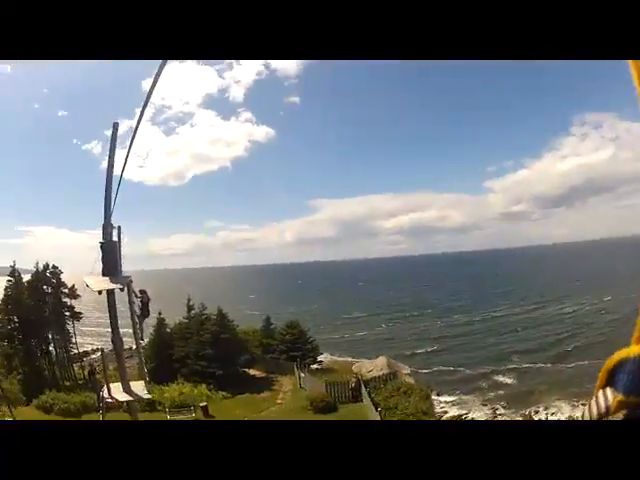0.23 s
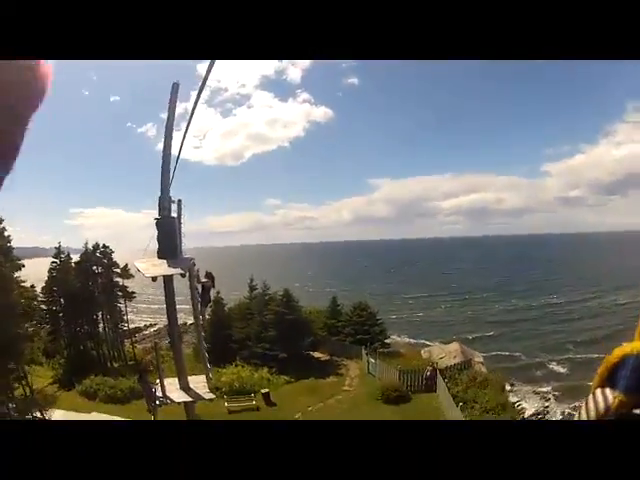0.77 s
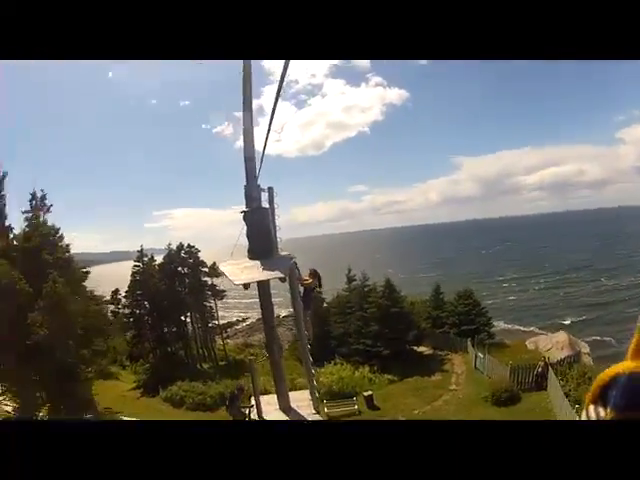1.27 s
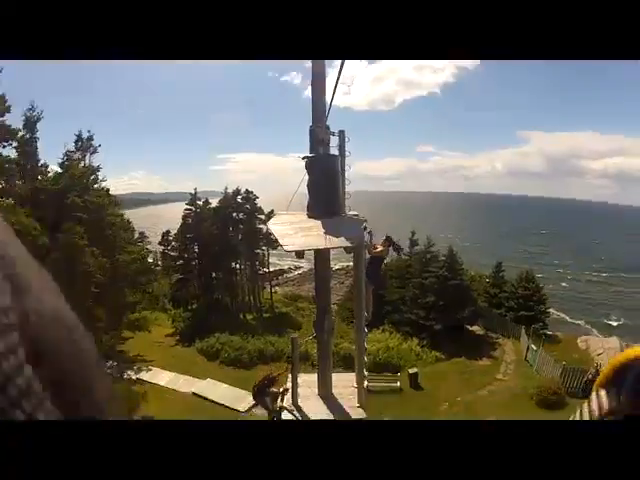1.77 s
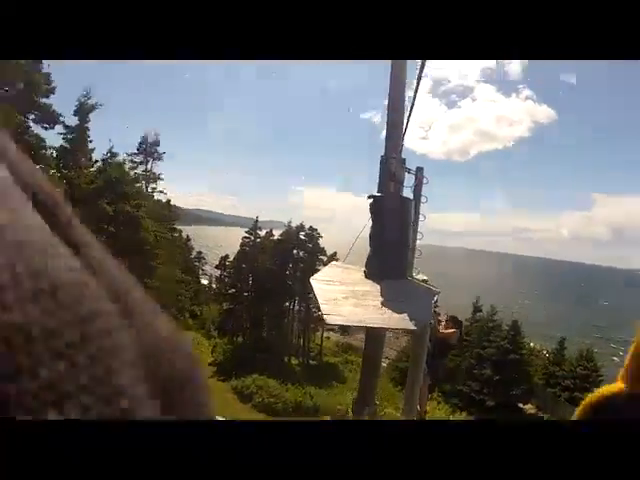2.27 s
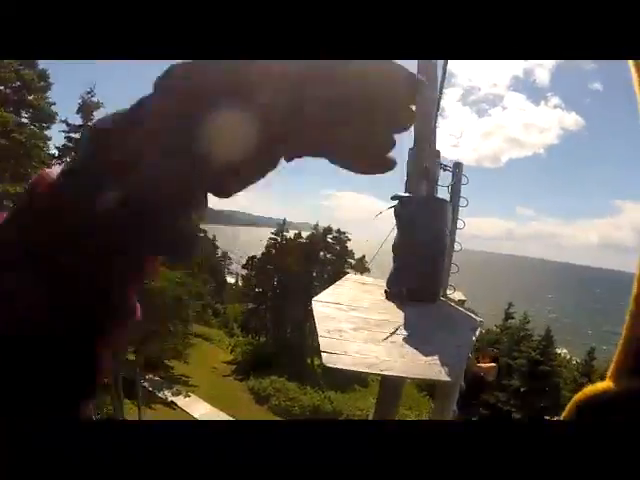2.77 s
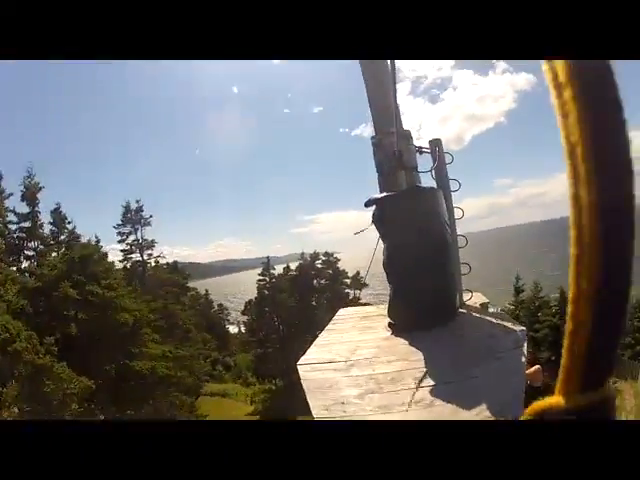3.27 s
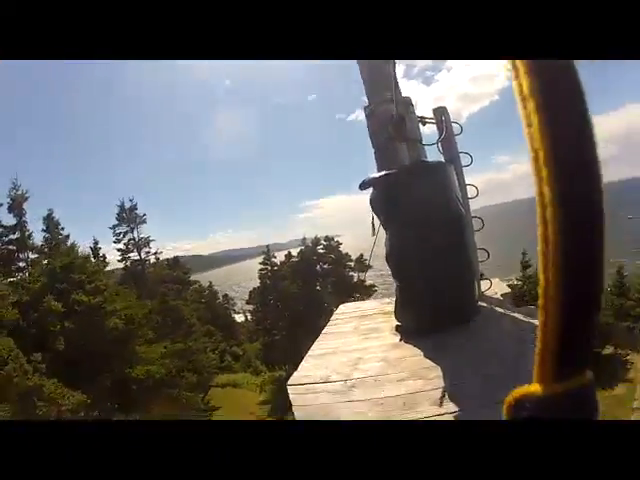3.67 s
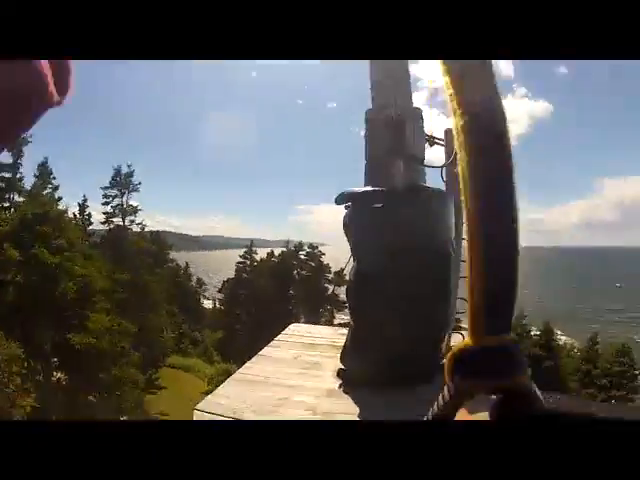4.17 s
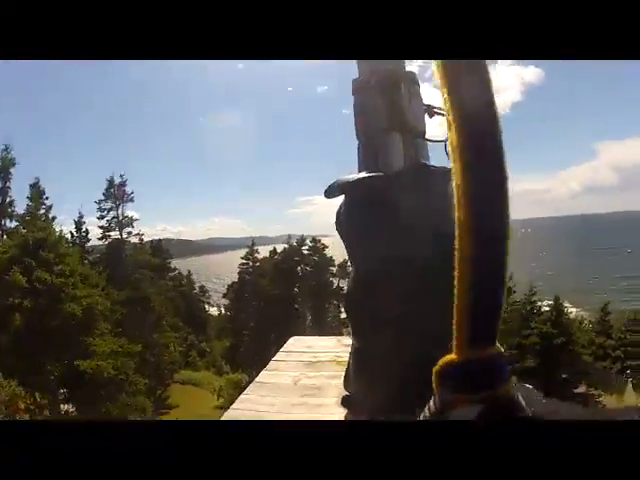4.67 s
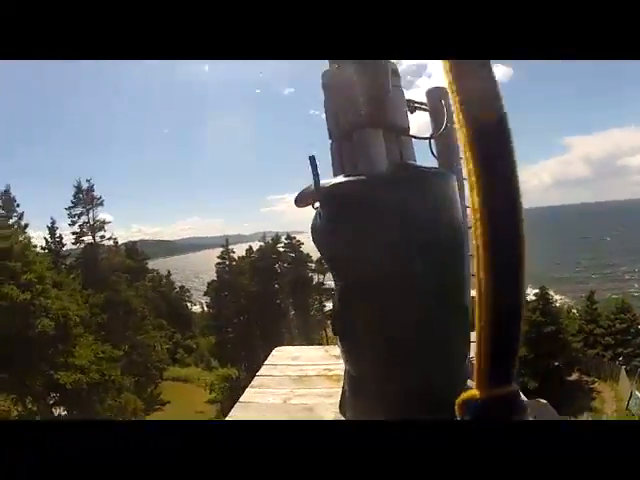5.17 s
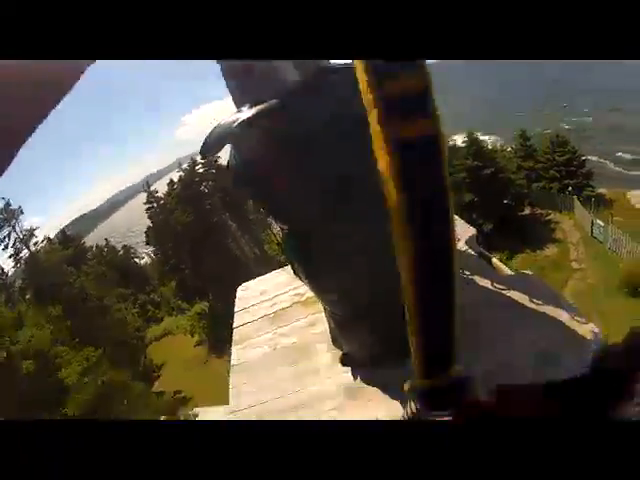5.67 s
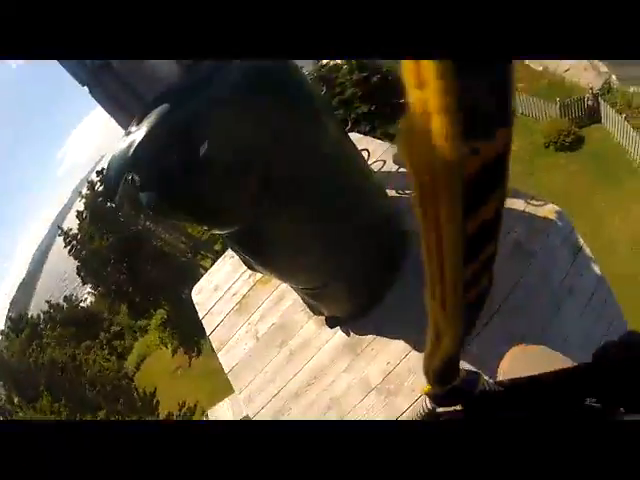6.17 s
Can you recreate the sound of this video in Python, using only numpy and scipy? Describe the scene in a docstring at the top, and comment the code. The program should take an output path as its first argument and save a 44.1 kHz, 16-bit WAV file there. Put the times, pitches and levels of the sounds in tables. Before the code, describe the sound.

Rushing metallic wheel hiss with a faint fluttering whine falls to ratchety ticking, amid blustery microphone wind, hard thumps, housing knocks and late clinks.

```python
"""Trolley wheels hiss over the strands of a zip line while wind buffets the rider's microphone.
The hiss is coloured noise that thins to strand-by-strand ticks as the ride slows, with a faint fluttering whine.
The wind is noise shaped by gusts, plus single pressure thumps. Gear knocks, scrapes and clinks at the camera:
short decaying sines and noise through resonances. A limiter ducks just after each overload."""
import sys
import numpy as np
from scipy import signal
from scipy.fft import rfft, irfft, next_fast_len
from scipy.io import wavfile
from scipy.ndimage import uniform_filter1d, map_coordinates

SR = 44100
rng = np.random.default_rng(int(sys.argv[2]) if len(sys.argv) > 2 else 0)


def output_pcm(signal):
    """Save a mono or channel-first signal as 16-bit PCM at the path in sys.argv[1].

    Samples are clipped to [-1, 1] before scaling.
    """
    pcm = np.clip(np.atleast_2d(signal).T, -1, 1) * 32767
    wavfile.write(sys.argv[1], SR, np.round(pcm).astype(np.int16))


N = 283122  # length in samples
REFERENCE_RATE = 119.6  # reference speed, strands per second


def amp(db):
    """Decibels to gain."""
    return 10 ** (np.asarray(db) / 20)


def unit(x):
    """Scale to rms 1."""
    return x / np.sqrt(np.mean(x ** 2) + 1e-20)


def curves(rows):
    """One value per sample for each column after the time."""
    times, *columns = np.transpose(rows)
    return [np.interp(np.arange(N) / SR, times, column) for column in columns]


def wobble(rate):
    """A smooth random curve with rate knots a second."""
    knots = rng.standard_normal(4000)
    return map_coordinates(knots, [np.arange(N) * rate / SR], mode="mirror")


def noise():
    """Fresh white noise."""
    return rng.standard_normal(N)


def filtered(x, response):
    """x with its spectrum multiplied by a response of frequency."""
    size = next_fast_len(N + 8192)
    spectrum = rfft(x, size) * response(np.fft.rfftfreq(size, 1 / SR))
    return irfft(spectrum, size)[..., :N]


def coloured(x, points):
    """x through a spectrum of (Hz, dB) points, at rms 1."""
    point_hz, point_db = np.transpose(points)

    def response(hz):
        return amp(np.interp(np.log(hz + 1), np.log(point_hz), point_db))

    return unit(filtered(x, response))


def patchy(x, depth_db):
    """Let the colour of x drift in patches of random gain over time and frequency."""
    frames = signal.stft(x, nperseg=1024)[2]
    field = rng.standard_normal(frames.shape)
    field = uniform_filter1d(field, size=5, axis=0)
    field = uniform_filter1d(field, size=12, axis=1)
    return signal.istft(frames * amp(depth_db * unit(field)))[1][:N]


def add(track, s, sound):
    """Mix a short sound into a track at time s."""
    room = track[round(s * SR):][:len(sound)]
    room += sound[:len(room)]


def strokes(rows):
    """A rounded swell for each (start, length, dB) row."""
    swell = np.zeros(N)
    for s, length, db in rows:
        shape = signal.windows.tukey(max(int(length * SR), 8), .5)
        add(swell, s, amp(db) * shape)
    return swell


def friction(modes, rows, grain_db):
    """Uneven slips excite the resonances of a body during each stroke."""
    def body(f):
        return sum(amp(db) / (1 + ((f - hz) / half_width) ** 2) for hz, half_width, db in modes)

    slips = noise() * amp(grain_db * wobble(430))
    return unit(filtered(slips, body)) * strokes(rows)


def doublings(rate):
    """Speed in doublings over the reference speed."""
    return np.log2(rate / REFERENCE_RATE)


# Gusts on the microphone.
# Each row: start in seconds, length in seconds, buffet level in dB, churn level in dB before wind's trim.
GUSTS = [(.025, 0.28, -12, -21), (0.385, 0.31, -11, -17.5), (0.946, .03, -10, -16),
         (1.141, 0.088, -4, -10.5), (1.288, 0.11, -5.5, -14), (1.482, .04, -9, -37),
         (1.833, 0.13, -17.5, -24), (2.016, 0.092, -14.5, -22.5), (2.167, 0.042, -4.5, -12.5),
         (2.276, 0.074, -5.5, -11.5), (2.32, 0.11, -5, -40), (2.505, 0.23, -10, -17),
         (2.702, 0.11, -7.5, -28), (3.233, 0.053, -14, -25.5), (3.293, 0.13, -11, -20.5),
         (4.129, .13, -14.5, -16.5), (4.427, 0.035, -13.5, -20), (4.733, 0.026, -10.5, -28),
         (4.801, 0.073, -11, -22), (5.175, .08, -22, -26), (5.358, 0.06, -12.5, -21.5),
         (5.445, 0.23, -7.5, -12), (5.684, 0.17, -7, -10), (5.886, 0.16, -8, -12), (6.07, 0.27, -11, -13.5),
         (6.367, 0.14, -3, -12.5)]
GUST_RISE_S, GUST_FALL_S = 0.011, 0.054  # time constants of a gust
# the airstream between gusts at the reference speed, churn before wind's trim
BREEZE_BUFFET_DB, BREEZE_CHURN_DB = -21, -25.5
BREEZE_DB_PER_DOUBLING = 0.5  # its growth with speed


def airflow(rate):
    """Buffet and churn in dB: a breeze that grows with speed, plus gusts that rise, hold and die away."""
    t = np.arange(N) / SR
    breeze_db = BREEZE_DB_PER_DOUBLING * doublings(rate)
    power = amp([breeze_db + BREEZE_BUFFET_DB, breeze_db + BREEZE_CHURN_DB]) ** 2
    for s, length, buffet_db, churn_db in GUSTS:
        rise = 1 - np.exp(-np.maximum(t - s, 0) / GUST_RISE_S)
        fall = np.exp(-np.maximum(t - s - length, 0) / GUST_FALL_S)
        power += (amp([[buffet_db], [churn_db]]) * rise * fall) ** 2
    return 10 * np.log10(power)


# Colours of the wind: deep buffets, churning eddies, whistle in the microphone port, hiss over the housing.
# Each row: frequency in Hz, relative level in dB.
BUFFET = [(12, -6), (30, -7.5), (90, 0), (150, -2), (230, -8.5), (400, -24.5), (800, -38), (1500, -80)]
CHURN = [(100, -15.5), (230, 2), (340, -1), (500, -8), (750, -17), (1050, -31.5), (1500, -42), (3000, -81)]
PORT = [(3000, 5), (6000, -41), (8500, -19), (10000, -20), (10800, -9), (11650, 12.5), (12450, 7.5),
        (13300, -38), (14200, -1), (15500, -6.5)]
RUSH = [(700, 14), (1400, -7), (2000, 2), (3000, -1), (3800, -1), (4800, -13.5), (6000, -22), (8300, -9),
        (10000, -6.5), (10800, -23), (14200, -15)]


def wind(rate, churn_gain_db=1, port_db=-22, rush_db=-13, rush_growth=1.08, side_db=-11, side_growth=2.86):
    """Eddies hit the microphone; the harder ones churn higher, whistle in its port and hiss over the housing."""
    buffet_db, churn_db = airflow(rate)
    eddies = wobble(45)
    buffet = coloured(noise(), BUFFET) * amp(buffet_db + 0.27 * eddies)
    churn_flicker_db = 0.8 * eddies + 2.47 * wobble(160)
    churn = coloured(noise(), CHURN) * amp(churn_db + churn_gain_db + churn_flicker_db)
    port = coloured(noise(), PORT) * amp(churn_db + port_db + 2 * eddies)
    # the rush grows faster than the churn
    rush = coloured(noise(), RUSH) * amp(rush_growth * churn_db + rush_db + 2.5 * eddies)
    # left and right differ mainly in strong turbulence
    side = coloured(noise(), BUFFET) * amp(side_db + side_growth * np.maximum(buffet_db, churn_db))
    return buffet + churn + port + rush + np.array([side, -side])


# Single hard gusts on the microphone.
# Each row: start in seconds, level in dB, length in seconds.
THUMPS = [(1.161, 7.5, 0.0061), (1.21, 3, 0.0053), (2.221, 5.5, 0.0059), (2.299, -5, 0.003),
          (2.67, 12.5, 0.009), (4.256, 3.5, 0.0063), (5.449, -17, 0.00517), (6.131, -1, 0.002)]


def thumps():
    """A hard gust is one push and pull of pressure."""
    out = np.zeros(N)
    for s, db, length in THUMPS:
        turn = np.linspace(0, 2 * np.pi, int(length * SR))
        add(out, s, amp(db) * np.sin(turn) * np.sin(turn / 2))
    return out


# Carabiner clinks. Each row: start in seconds, level in dB.
CLINKS = [(5.8961, -30), (5.908, -32), (6.368, -18), (6.385, -14.5)]
# Modes of the carabiner. Each row: frequency in Hz, relative level in dB, 60 dB decay time in seconds.
STEEL = [(4100, -4, 0.016), (4640, -4, 0.02), (4970, -2, 0.016), (7000, -4, 0.016), (7660, -12, 0.032),
         (9300, -25, .03), (14700, -17, .025)]


def clinks():
    """The carabiner shifts as the rider swings in; its loaded steel rings only briefly."""
    out, t = np.zeros(N), np.arange(SR // 10) / SR
    for s, db in CLINKS:
        for hz, mode_db, t60 in STEEL:
            # a wandering phase roughens each mode
            phase = 2 * np.pi * hz * t + 0.12 * np.cumsum(rng.standard_normal(len(t)))
            level_db = db + mode_db + rng.normal(0, 1.8)
            add(out, s, amp(level_db - 60 * t / t60) * np.sin(phase))
    return out


# Gear scraping along the housing. Each row: start in seconds, length in seconds, level in dB.
SCRAPES = [(3.983, 0.017, -32), (3.994, 0.018, -22), (4.008, 0.057, -23.5), (4.055, 0.036, -19),
           (4.133, 0.04, -23), (4.226, 0.045, -28), (4.734, 0.027, -31)]
# Resonances of the scrape. Each row: frequency in Hz, half-width in Hz, relative level in dB.
SCRAPE_MODES = [(720, 210, 20), (1020, 96, -13), (1570, 330, -2), (3670, 100, 8.5), (4430, 320, 3),
                (7470, 160, 3), (8400, 76, 3), (11140, 250, 0), (13000, 250, -29)]


def scrapes():
    """Gear slips along the camera housing and excites its resonances."""
    return friction(SCRAPE_MODES, SCRAPES, grain_db=1)


# Knocks on the housing.
# Each row: start in seconds, level in dB before panning, ring in Hz, overtone in Hz, relative overtone level in dB.
KNOCKS = [(3.8892, 12.5, 594, 2010, -8.5), (3.9800, -5.5, 860, 1370, -16), (4.059, -17, 840, 3470, -22),
          (4.0780, -6.5, 870, 3600, -8), (4.124, 1.5, 770, 1390, -18), (4.321, 11.5, 700, 1960, -26),
          (4.7060, 13.5, 710, 910, -7)]
KNOCK_LEFT_DB = 0.95  # the knocks land a little nearer the left port


def knocks(crack_db=-16, port_db=-26, contact=0.0016, t60=0.008):
    """Each blow drives the stiff housing while the contact lasts, then it dies within a few cycles."""
    out, t = np.zeros(N), np.arange(SR // 20) / SR
    fade = (1 - np.exp(-t / 0.0021)) * amp(-60 * np.maximum(t - contact, 0) / t60)
    for s, db, ring_hz, upper_hz, upper_db in KNOCKS:
        ring = np.sin(2 * np.pi * ring_hz * t) + amp(upper_db) * np.sin(2 * np.pi * upper_hz * t)
        crack = amp(crack_db) * signal.lfilter([.5], [1, -.5], rng.standard_normal(len(t)))
        port = amp(port_db) * np.sin(2 * np.pi * 12000 * t)  # the jolt also rings the microphone port
        add(out, s, amp(db) * fade * (ring + crack + port))
    return out * amp([[KNOCK_LEFT_DB], [-KNOCK_LEFT_DB]])


# Wheel flanges rubbing on the cable as the rider sways.
# Each row: start in seconds, length in seconds, level in dB.
RUBS = [(0.73, 0.22, -26), (3.58, 0.078, -32.5), (3.623, 0.022, -30), (5.673, 0.21, -32),
        (5.835, 0.39, -30)]
# Resonances of the flanges. Each row: frequency in Hz, half-width in Hz, relative level in dB.
FLANGE_MODES = [(1883, 120, -3), (2150, 95, -15), (2460, 99, -5.5)]


def rubs():
    """The flanges slip along the cable and excite their own resonances."""
    return friction(FLANGE_MODES, RUBS, grain_db=2.0)


# Partials of the whine.
# Each row: multiple of the strand rate, relative level in dB, pitch flutter as a share.
WHINE_ORDERS = [(3.25, 22, .03), (8.6, 8, .03), (11.7, 6, .025)]
WHINE_BELOW_DB = -37  # the ever-present whine relative to the rolling level, before each partial's own level


def whine(rate, rolling_db):
    """Fuzzy partials follow the wheels' speed and swell as they cross the trolley's resonances."""
    leaning = strokes([(s, length, db) for s, length, db, _ in LEANS])
    whine_db = 20 * np.log10(amp(rolling_db + WHINE_BELOW_DB) + leaning)
    body_hz, body_db = np.transpose(TROLLEY)
    out = np.zeros(N)
    for multiple, db, flutter in WHINE_ORDERS:
        pitch = multiple * rate * (1 + flutter * wobble(150))
        level_db = whine_db + db + np.interp(pitch, body_hz, body_db) + 3 * wobble(29.58)
        out += np.sqrt(2) * amp(level_db) * np.sin(2 * np.pi * np.cumsum(pitch) / SR)
    return out


def strand_ticks(rate, scatter, size_db, t60):
    """One short burst of force for each strand that a wheel rolls over."""
    strand = np.arange(1500)
    late, size = rng.standard_normal((len(strand), 2)).T
    strands_passed = np.cumsum(rate) / SR
    at = np.interp(strand + scatter * late, strands_passed, np.arange(N), right=N).astype(int)
    kicks = np.bincount(at, amp(size_db * np.clip(size, -2, 2)), N + 1)[:N]
    t = np.arange(SR // 20) / SR
    burst = amp(-60 * t / t60) * (1 - np.exp(-t / 0.00021))
    return unit(signal.fftconvolve(kicks, burst)[:N] / np.sqrt(rate))


# Colour of the rolling hiss, then of single strand ticks.
# Each row: frequency in Hz, relative level in dB.
TROLLEY = [(500, -2), (1250, -18), (1650, -11), (1950, 1), (2400, -3.5), (2900, 1), (3300, -8.5),
           (3680, -2), (4080, -11.5), (4750, 3.5), (5350, -6.5), (6000, -24), (6700, -7.5), (7300, -0.5),
           (7900, -15.5), (9000, -12.5), (10000, -12.5), (10900, -48), (13200, -47), (14000, -16.5),
           (15200, -13)]
TICKS = [(700, -23), (1500, -11.5), (2200, 0.5), (2950, 3.5), (3900, -5.5), (4500, 1.5), (5300, -1.5),
         (6000, -24), (6800, -1), (7600, -7.5), (9200, -6.5), (10800, -23.5), (13200, -18), (14400, -12),
         (15300, -19.5)]
# The trolley catching on the cable. Each row: start in seconds, length in seconds, level in dB.
CATCHES = [(2.995, 0.019, -20.5), (3.59, 0.052, -28), (3.63, 0.026, -26), (4.2333, 0.02, -32),
           (4.5766, 0.012, -51), (5.231, 0.002, -32), (5.354, 0.0044, -30), (5.4002, 0.0011, -26),
           (5.418, 0.0036, -30)]
# The wheels lean into the cable and sing.
# Each row: start in seconds, length in seconds, whine dB before each partial's level, change of rolling level in dB.
LEANS = [(0.683, 0.51, -50.5, -2), (2.773, 0.39, -50.5, 1)]
ROLL_DB, ROLL_DB_PER_DOUBLING = -30.5, 14  # base level at the reference speed, and its growth with speed
SWAY_DB, SWAY_PER_S = 1.1, 11  # depth and knots a second of the sway in tick level
BEARING_SHARE = 0.048  # steady hiss of the bearings that stays under the ticks, as a share of power


def trolley(rate, roll_db=1.5, tick_db=3, blur_rate=160):
    """Two wheels tick over the strands; at speed the ticks blur into a hiss with a faint whine."""
    level_db = ROLL_DB + ROLL_DB_PER_DOUBLING * doublings(rate)
    level_db += sum(db * strokes([(s, length, 0)]) for s, length, _, db in LEANS)
    front = strand_ticks(rate, scatter=.16, size_db=3, t60=.018)
    rear = strand_ticks(rate, scatter=.45, size_db=3, t60=.018)
    blur = 1 / (1 + (blur_rate / rate) ** 3)  # share of steady rubbing
    ticks = coloured(noise() * front + noise() * rear, TICKS)
    ticks = ticks * amp(tick_db + SWAY_DB * wobble(SWAY_PER_S))
    hiss = coloured(patchy(noise(), depth_db=2.93), TROLLEY) * amp(roll_db)
    rolling = np.sqrt(np.maximum(blur, BEARING_SHARE)) * hiss + (1 - blur) * ticks
    rolling = rolling * amp(level_db + 1.47 * wobble(55))
    catches = coloured(noise(), TICKS) * strokes(CATCHES)
    return rolling + catches + whine(rate, level_db)


# Speed of the trolley. Each row: time in seconds, strands passed per second.
SPEED = [(0, 216), (.35, 232), (.72, 216), (.98, 243), (1.14, 228), (1.27, 194), (1.52, 216), (1.75, 180),
         (2.12, 194), (2.42, 150), (2.9, 138), (3.2, 111), (3.5, 92), (4.1, 84), (4.4, 59), (5.5, 63),
         (6.42, 30)]


def scene():
    """The trolley's speed drives wheels and airstream; wind and knocks alone differ between left and right."""
    rate, = curves(SPEED)
    gear = clinks() + scrapes() + knocks()
    return wind(rate) + thumps() + gear + rubs() + trolley(rate)


TOP_HZ = 15400  # nothing passes above this


def record(dry, ceiling_db=0.0, mismatch_db=0.34):
    """Each channel's own limiter ducks just after an overload and recovers; what slips past saturates."""
    lag, attack, release = .0025, .001, .04  # seconds
    knee = 8  # exponent: higher saturates more abruptly
    t = np.arange(N) / SR
    ceilings_db = ceiling_db + np.array([[mismatch_db], [-mismatch_db]])
    over_db = np.maximum(20 * np.log10(np.abs(dry) + 1e-9) - ceilings_db, 1e-6)
    # hold each overload and let its decibels decay exponentially
    held_db = np.exp(np.maximum.accumulate(np.log(over_db) + t / release, axis=1) - t / release)
    late_db = [np.interp(t - lag, t, held) for held in held_db]
    keep = np.exp(-1 / (attack * SR))
    duck_db = signal.lfilter([1 - keep], [1, -keep], late_db)
    limited = dry * amp(-duck_db)
    saturated = limited / (1 + np.abs(limited) ** knee) ** (1 / knee)
    return filtered(saturated, lambda hz: hz < TOP_HZ)


dry = scene()
out = record(dry)
output_pcm(out)
```